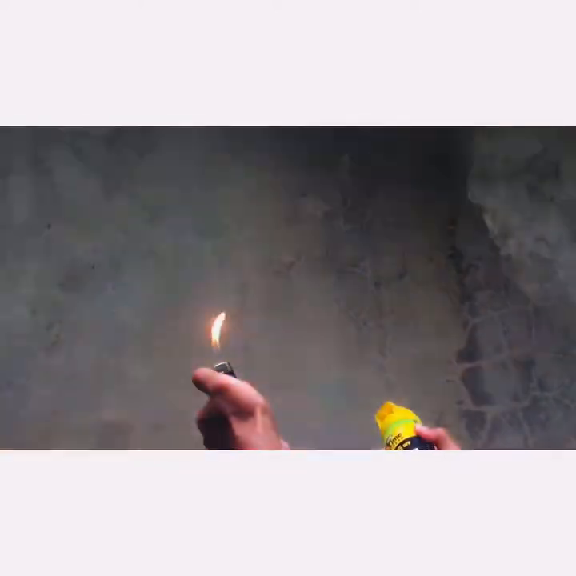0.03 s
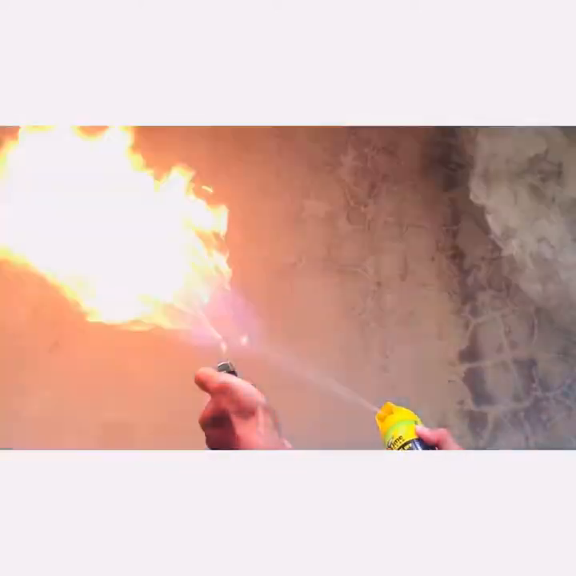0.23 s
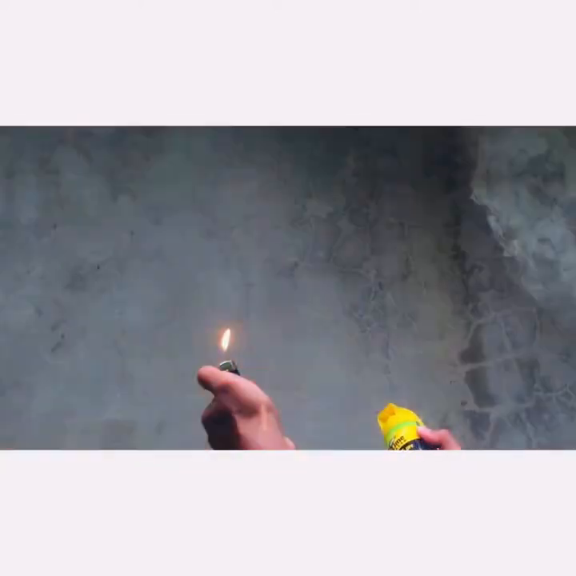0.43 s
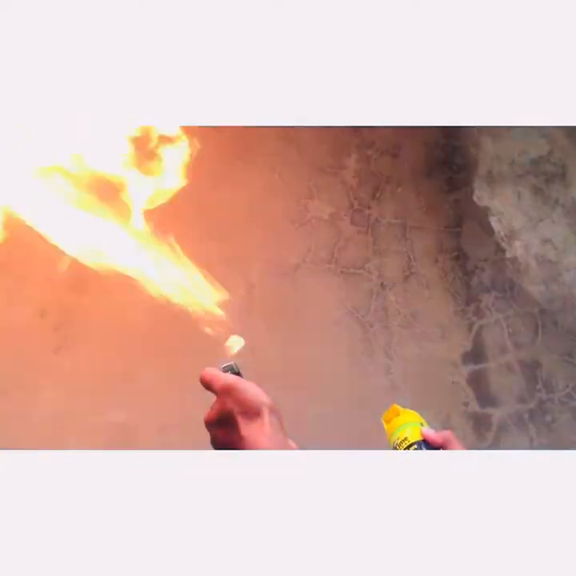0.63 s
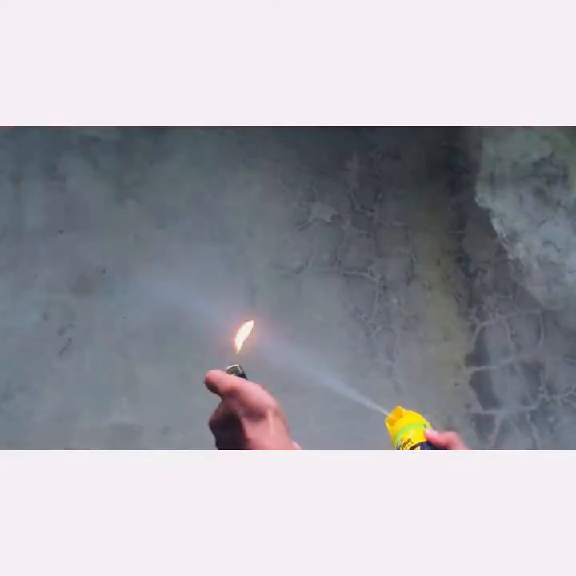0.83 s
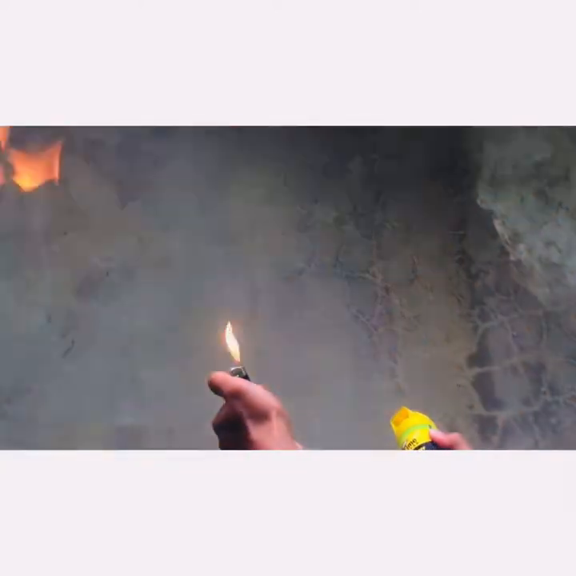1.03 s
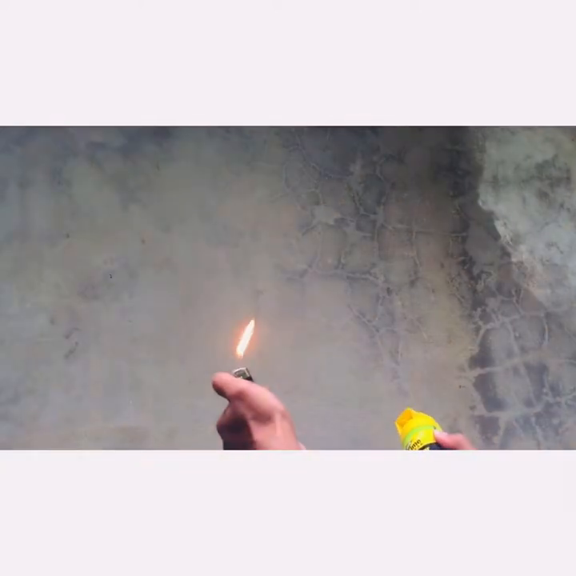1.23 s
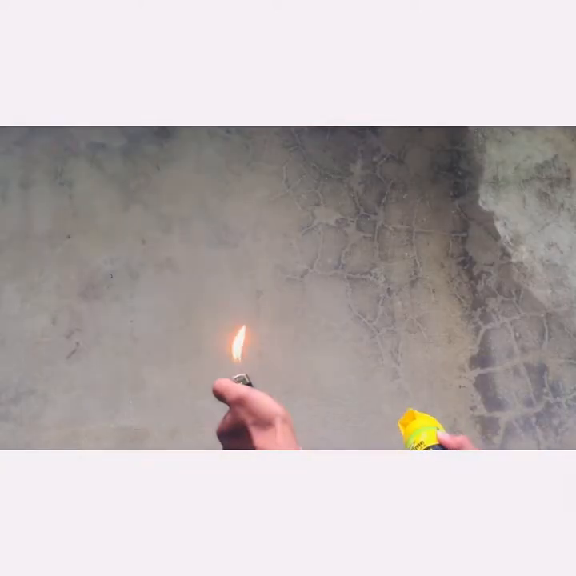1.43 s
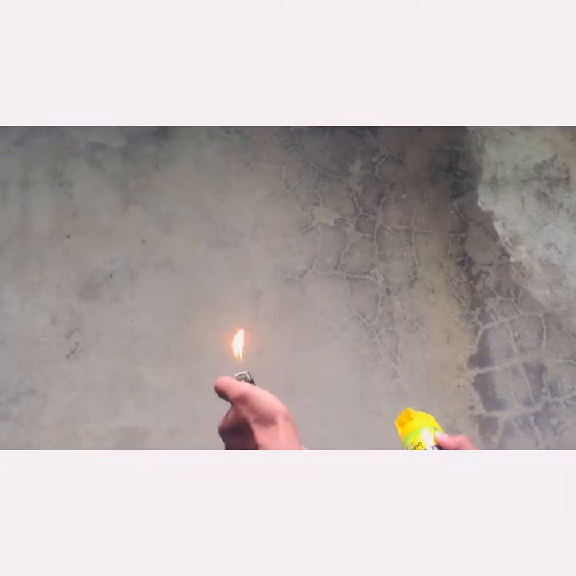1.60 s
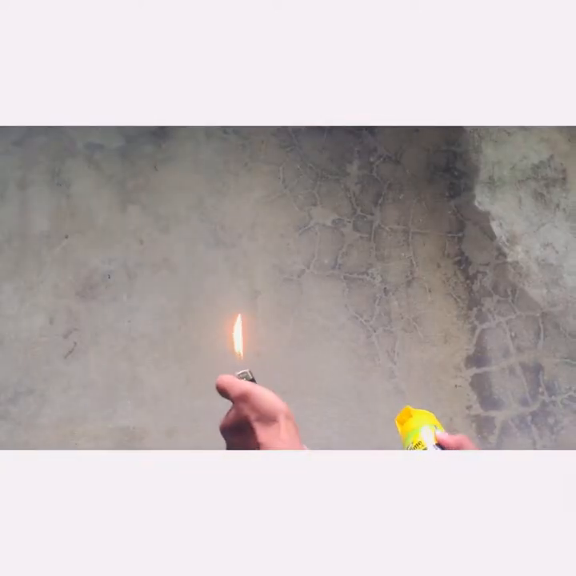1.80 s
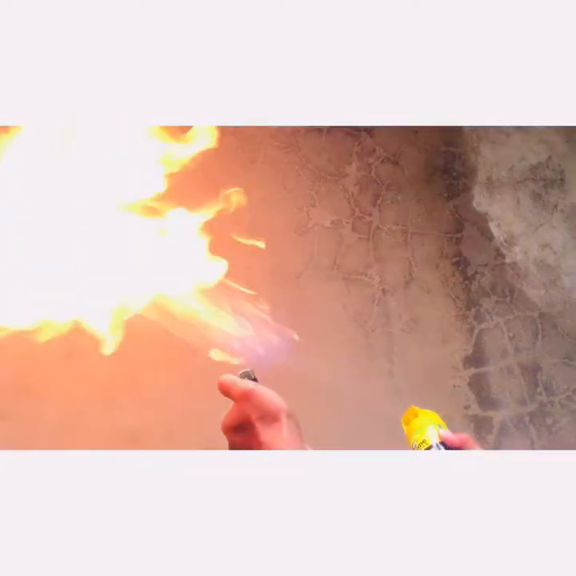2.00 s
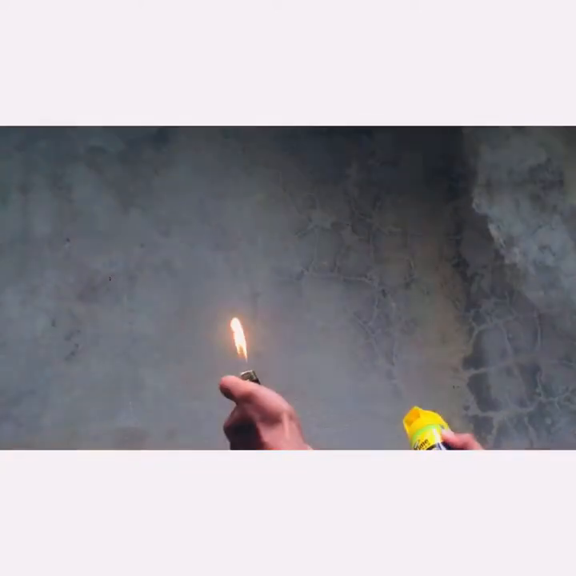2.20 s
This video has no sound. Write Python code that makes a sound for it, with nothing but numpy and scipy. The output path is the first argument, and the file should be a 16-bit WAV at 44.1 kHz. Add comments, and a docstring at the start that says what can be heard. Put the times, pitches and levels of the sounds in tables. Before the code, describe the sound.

Four fireballs whoosh as an aerosol can squirts across a lighter flame outdoors. Each short hiss ignites with a low thump and fluttering roar, three in quick succession, then one more, with faint wind on the microphone.

```python
"""Outdoors beside a wall, four short squirts from an aerosol can cross a lighter flame.
Each hiss swells, catches fire with a low thump and burns as a fluttering, roaring fireball
until the fuel is gone. The wall and the yard add a short echo. Light air rumbles on the
microphone, and a distant bird whistles four times over a faint background."""
import sys
import numpy as np
from scipy import signal
from scipy.fft import rfft, irfft, next_fast_len
from scipy.io import wavfile
from scipy.ndimage import map_coordinates

SR = 44100
rng = np.random.default_rng(int(sys.argv[2]) if len(sys.argv) > 2 else 0)


def master(y):
    """Save y as 16-bit WAV."""
    cut = np.clip(np.atleast_2d(y).T, -1, 1)
    pcm = np.round(cut * 32767)  # scale
    wavfile.write(sys.argv[1], SR, pcm.astype(np.int16))


N = 103635  # samples, 2.35 s


def amp(db):
    """Turn decibels into a number to multiply by."""
    return 10 ** (np.asarray(db) / 20)


def unit(x):
    """Scale a sound to an average strength (rms) of 1."""
    return x / np.sqrt(np.mean(x ** 2) + 1e-20)


def along(points, hz):
    """Read between the (pitch_hz, value) rows of a table, giving each octave equal room."""
    pitches, values = np.transpose(points)
    return np.interp(np.log(hz + 1), np.log(pitches + 1), values)


def clock():
    """The time of every sample, in seconds."""
    return np.arange(N) / SR


def wobble(rate):
    """A smooth curve through `rate` random values a second."""
    return map_coordinates(rng.standard_normal(int(N * rate / SR) + 4), [clock() * rate])


def filtered(x, response):
    """Turn each frequency of x up or down by response(hz)."""
    size = next_fast_len(N + SR // 2)
    return irfft(rfft(x, size) * response(np.fft.rfftfreq(size, 1 / SR)), size)[:N]


def coloured(x, tone):
    """Shape the bass and treble of x by a tone table, then scale it to strength 1."""
    return unit(filtered(x, lambda hz: amp(along(tone, hz))))


def noise(tone):
    """Noise of strength 1, shaped by a tone table."""
    return coloured(rng.standard_normal(N), tone)


def gate(start, stop, rise_s, release_s):
    """A loudness curve that rises in a straight line, holds, and dies away after stop."""
    t = clock()
    return np.clip((t - start) / rise_s, 0, 1) * np.exp(-np.maximum(t - stop, 0) / release_s)


def air(breeze_db=-66, buffet_db=2.75, drift_db=1.5):
    """Small gusts rumble on the microphone over a slowly drifting outdoor background."""
    # Gusts on the microphone: middle_s, half_length_s, level_db
    gusts = [(0.08, 0.049, -58.5), (0.67, 0.058, -50), (1.029, 0.031, -52), (1.122, 0.022, -49.5),
             (1.204, .03, -50), (1.276, 0.041, -53), (1.406, 0.038, -49), (2.116, 0.015, -56),
             (2.345, 0.021, -48.5)]
    # Tone of the wind's rumble: pitch_hz, relative_db
    rumble_tone = [(20, -43), (40, -1), (70, 0), (110, -12.5), (190, -20.5), (260, -36), (500, -67),
                   (2000, -84)]
    # Loudness of the background over time: time_s, level_db
    background_levels = [(0, -70.5), (.4, -73.5), (.72, -70.5), (1.08, -73.5), (1.22, -71.5), (1.75, -72),
                         (2.12, -71), (2.33, -71.5)]
    # Tone of the background: pitch_hz, relative_db
    background_tone = [(100, -23), (200, 0), (255, -1), (305, 1.5), (375, -3), (430, -6), (530, -6),
                       (655, -2.5), (815, -9), (1020, -6.5), (1500, -9.5), (3500, -12), (5000, -17),
                       (9000, -22.5), (12000, -26), (15800, -31)]
    t = clock()
    gusting = sum(amp(db) * np.exp(-((t - middle) / half) ** 2) for middle, half, db in gusts)
    background_db = np.interp(t, *np.transpose(background_levels)) + drift_db * wobble(8.1)
    rumble = (amp(breeze_db) + gusting) * amp(buffet_db * wobble(21.88)) * noise(rumble_tone)
    return rumble + amp(background_db) * noise(background_tone)


def spray(opening_s=0.0033, first_share=0.049, ease_db_per_s=75, sputter_db=-0.3):
    """The nozzle hisses: a first jet leaves at once, the rest builds up, then the finger eases off."""
    # Presses of the valve: start_s, stop_s, level_db, swell_s, release_s
    squirts = [(0.113, 0.249, -43.5, 0.082, 0.018), (0.462, 0.588, -43, 0.076, 0.021),
               (0.77, 0.903, -43, 0.084, 0.034), (1.847, 1.977, -42, 0.079, 0.025)]
    # Tone of the hiss: pitch_hz, relative_db
    hiss_tone = [(280, -15), (480, -18), (652, -6), (940, -11.5), (1070, -2.5), (1240, -13), (1640, -7),
                 (2260, -11.5), (2610, -5), (3070, -10), (3400, -2.5), (4890, -3.5), (5340, 1), (7690, -11),
                 (10200, -16), (11700, -8.5), (15700, -2.5)]
    flow = np.zeros(N)
    for start, stop, db, swell, release in squirts:
        first_jet = first_share * gate(start, stop, opening_s, release)
        build_up = (1 - first_share) * gate(start, stop, swell, release)
        eased_db = ease_db_per_s * np.maximum(clock() - start - swell, 0)
        flow += (first_jet + build_up) * amp(db - eased_db)
    return flow * amp(sputter_db * wobble(190)) * noise(hiss_tone)


def yard(x):
    """The yard answers a sound with a short echo tail whose highest treble dies first."""
    # Time the echo takes to fall by 60 dB: pitch_hz, fade_s
    fade_times = [(60, 0.52), (150, 0.092), (310, 0.39), (450, 0.44), (660, 0.26), (1000, 0.35),
                  (6000, 0.24), (15000, 0.055)]
    hz, t, spectrum = signal.stft(rng.standard_normal(SR // 2), SR, nperseg=256)
    fading = amp(-60 * t / along(fade_times, hz)[:, None])
    tail = signal.istft(spectrum * fading, SR, nperseg=256)[1]
    return signal.fftconvolve(x, tail / np.linalg.norm(tail))[:N]


def fireballs(rise_s=0.00927, release_s=0.014, grow_s=0.0043, catch_s=0.0031, rough_db=4.5):
    """Flame crackles through the mist, which then roars and flutters, fading as the fuel runs out."""
    # Fireballs: start_s, burn_s, roar_db, flutter_db, crackle_db, fade_db_per_s
    flames = [(0.198, 0.078, -32, -22.5, -56, 112), (.531, 0.08, -32, -26.5, -37, 85),
              (.904, 0.02, -31, -26.5, -37, 247), (1.908, 0.1, -34.5, -26.5, -58, 70)]
    # Tone of the crackle: pitch_hz, relative_db
    crackle_tone = [(300, -13), (880, -14), (1050, 3), (1450, 0.5), (1900, -7), (2700, -7.5), (4000, -18.5),
                    (9000, -24.5), (15000, -32)]
    roar_level, catch_level, flutter = np.zeros((3, N))
    for start, burn, roar_db, flutter_db, crackle_db, fade in flames:
        fuel = amp(-fade * np.maximum(clock() - start, 0))
        catch_level += amp(crackle_db) * gate(start, start + catch_s, catch_s, release_s=0.0058)
        roar_level += amp(roar_db) * fuel * gate(start, start + burn, rise_s, release_s)
        grown = start + grow_s  # the ball grows before it sheds puffs
        flutter_level = amp(flutter_db) * fuel * gate(grown, grown + burn, rise_s, release_s)
        flutter += flutter_level * puffs(grown + rise_s)
    crackle_level = catch_level + amp(-10.5) * roar_level  # some crackle goes on during the roar
    crackle = crackle_level * unit(noise(crackle_tone) * amp(rough_db * wobble(500)))
    roar = filtered(roar_level * rng.standard_normal(N), hollow)
    return roar + crackle + flutter


def hollow(hz):
    """The space by the wall rings at a few pitches: a hollow-sounding filter of average power 1."""
    # Pitches at which the space rings: pitch_hz, width_hz, relative_db
    rings = [(172, 49, 6.5), (300.8, 33, 8.5), (402.4, 36, 7.5), (512, 72, 0.5), (639, 68, 5.5),
             (729, 22.5, 2), (964, 72, -8), (1260, 140, -12.5)]
    response = 0
    for pitch, width, db in rings:
        peak = 1j * hz * width / (pitch ** 2 - hz ** 2 + 1j * hz * width)
        treble_cut = 1 / (1 + (hz / (2 * pitch)) ** 2)
        response += amp(db) * peak * treble_cut
    return response / np.sqrt(np.mean(abs(response) ** 2))


def puffs(start, per_second=66.87, gap_scatter=0.2, size_scatter_db=2, count=24):
    """A fireball sheds an uneven run of soft pressure puffs, heard as a flutter."""
    # Tone of the puffs: pitch_hz, relative_db
    puff_tone = [(20, -40), (32, -33), (47, 1.5), (62, 1), (90, -7), (130, 4), (185, -0.5), (250, -27.5),
                 (500, -57), (2000, -69)]
    gap_chance, size_chance = rng.standard_normal((count, 2)).T
    times = start + (np.cumsum(np.exp(gap_scatter * gap_chance)) - 1) / per_second
    clicks = np.bincount(np.round(times * SR).astype(int), amp(size_scatter_db * size_chance), N)[:N]
    time_share = count / per_second * SR / N
    return coloured(clicks, puff_tone) * np.sqrt(time_share)  # strength near 1 while the puffs last


def thumps():
    """Gas that flares up all at once sends out one short, low swing of pressure."""
    # Sudden flares: middle_s, level_db, pitch_hz, half_length_s
    flares = [(0.225, -17.5, 57.4, 0.017), (0.563, -22, 57.4, 0.02), (0.931, -13.5, 65.4, 0.0099),
              (1.929, -15.5, 64, 0.01), (2.006, -18.5, 103, 0.0078)]
    out = np.zeros(N)
    for middle, db, hz, half in flares:
        t = clock() - middle
        swell = 1 / np.cosh(np.clip(2 * t / half, -20, 20))
        out += amp(db) * swell * np.sin(2 * np.pi * hz * t)
    return out


def bird(blur_hz=55, flicker_db=3.5, direct_db=-2, echo_db=-6):
    """A far bird's whistles glide and swell, blurred and broken up by echoes."""
    # Whistles: start_s, length_s, from_hz, to_hz, level_db
    whistles = [(1.233, 0.078, 3530, 2186, -75.5), (1.449, 0.096, 3770, 2300, -73.5),
                (1.762, 0.19, 2350, 2780, -72.5), (2.106, .095, 3980, 2150, -68)]
    song = np.zeros(N)
    for start, length, from_hz, to_hz, db in whistles:
        progress = np.clip((clock() - start) / length, 0, 1)
        hz = from_hz * (to_hz / from_hz) ** progress + blur_hz * wobble(900)
        level = amp(db + flicker_db * wobble(90)) * np.sin(np.pi * progress)
        song += level * np.sin(2 * np.pi * np.cumsum(hz) / SR)
    return amp(direct_db) * song + amp(echo_db) * yard(song)


def scene(wall_delay_s=0.0088, wall_db=-13, yard_db=-20):
    """Mix the spray and fire, their echoes from wall and yard, the air and the bird."""
    jet = spray() + fireballs()
    wall_echo = amp(wall_db) * np.interp(clock() - wall_delay_s, clock(), jet)
    near = jet + thumps() + wall_echo
    return (near + amp(yard_db) * yard(near) + air() + bird())[None]


def record(dry, low_cut_hz=28, top_hz=15950, edge_hz=300):
    """The microphone loses the deepest bass and keeps nothing above its highest pitch."""
    def microphone(hz):
        treble_cut = np.sin(np.pi / 2 * np.clip((top_hz - hz) / edge_hz, 0, 1)) ** 2
        bass_cut = 1 - 1 / (1 + (hz / low_cut_hz) ** 4)
        return treble_cut * bass_cut
    return filtered(dry[0], microphone)[None]


dry = scene()
out = record(dry)
master(out)
```